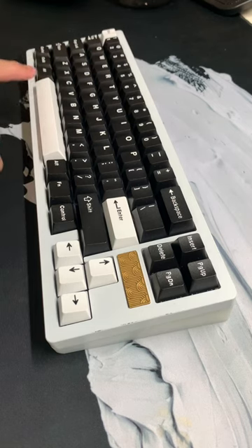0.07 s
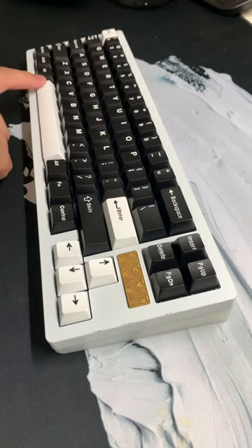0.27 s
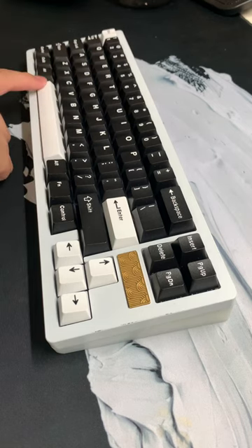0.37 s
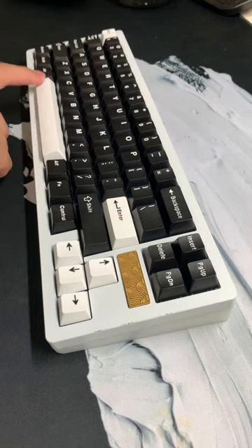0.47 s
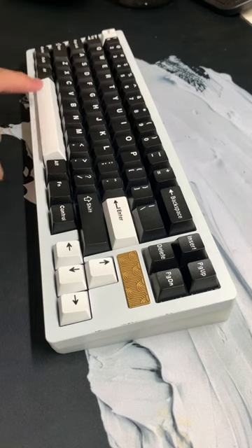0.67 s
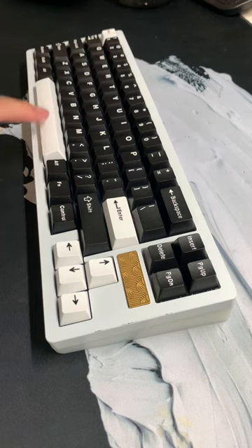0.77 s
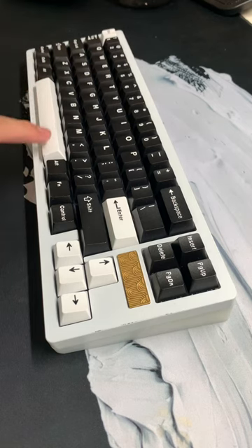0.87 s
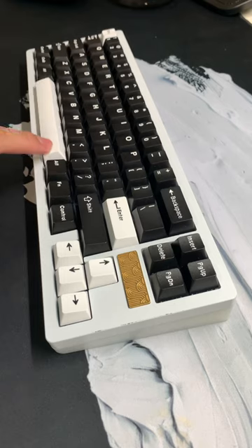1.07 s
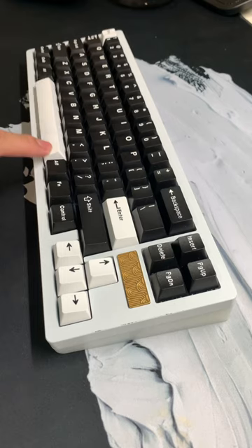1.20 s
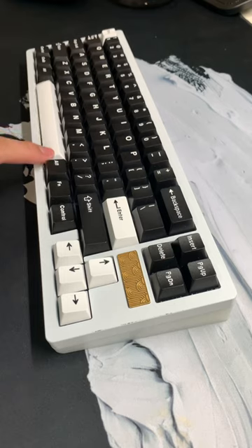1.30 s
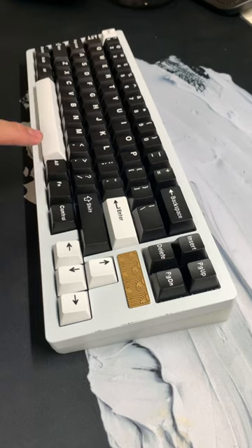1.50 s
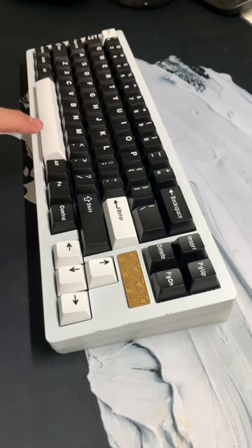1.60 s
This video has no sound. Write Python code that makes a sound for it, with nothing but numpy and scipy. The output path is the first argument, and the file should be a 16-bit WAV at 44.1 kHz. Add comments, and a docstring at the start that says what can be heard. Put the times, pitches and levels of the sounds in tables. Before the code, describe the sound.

Close by in a quiet room, a finger taps a mechanical keyboard spacebar in two quick sets of three. It clicks sharply going down and springing back, the second set fuller, over a faint low hum.

```python
"""At a desk in a small room, a finger taps the spacebar of a mechanical keyboard three times toward its
left end, then three times at its right end. Each press slides down with friction and clacks on the plate;
each release knocks the bar against its top stop. The impacts excite damped modes of bar and case,
the desk and the room reflect the sound, and a low hum lies underneath."""
import sys
import numpy as np
from scipy import signal
from scipy.fft import rfft, irfft
from scipy.io import wavfile

SR = 44100
rng = np.random.default_rng(int(sys.argv[2]) if len(sys.argv) > 2 else 0)


def unload_audio(sound):
    """Save the sound as a 16-bit wav file, at the path given as the first command line argument."""
    columns = np.transpose(np.atleast_2d(sound))
    # keep every value between -1 and 1, then stretch to whole-number steps
    steps = np.round(np.clip(columns, -1, 1) * 32767)
    wavfile.write(sys.argv[1], SR, steps.astype(np.int16))


N = 72765

# Rumble and hiss: f/Hz, relative spectral level/dB
AIR_SPECTRUM = [(12, -68), (20, -31), (43, -11.5), (65, -3), (81, -11), (130, -2.5), (163, -20.5),
                (198, -14), (347, -24), (377, -35), (558, -28), (849, -33), (949, -34.5), (1090, -37.5),
                (2750, -50.5), (9670, -55.5), (16000, -64.5)]
# Hum bands: f/Hz, level/dB, width/Hz
HUM_BANDS = [(56, -63.5, 2.3), (130.9, -64, 2.3), (233.4, -75.5, 2.7)]
# Diffuse field: f/Hz, left-right correlation
COHERENCE = [(50, 0.94), (250, 0.74), (700, 0.32), (1500, 0.057), (7000, 0.14), (10500, .9)]
# Finger brushing the bar: t/s, relative level/dB
TOUCHES = [(.1945, 6), (0.956, -13), (1.346, -3)]
# Stem friction: f/Hz, level/dB
SLIDE_TONE = [(200, -8.5), (1000, -3), (2500, 2.5), (5500, -1), (7500, -6), (14000, -25)]
# Bar hitting the plate: t/s, level/dB, thock/dB, clack/dB, treble/dB, place (0 left, 1 right)
PRESSES = [(0.2094, 2.5, -0.5, -1, -2, 0.11), (0.3631, -0.5, 1.5, -3, -2, 0.35),
           (0.5144, 0.5, -1, 0, -2.5, 0.081), (0.9705, 0, 5.5, 1, 4.5, 0.95),
           (1.1203, 0, 3.5, 2.5, 2.5, 0.92), (1.2741, -1, 7, 1, 3, 0.94)]
# Bar hitting its top stop: columns as in PRESSES, then the other end's delay/s, relative level/dB
RELEASES = [(0.301, -5.5, -0.5, -4, 1, 0.29, 0.00072, -7.5), (.4437, -1.5, -5.5, -4, -5.5, 0.19, .0008, -9),
            (.6016, 0.5, -1.5, -8.5, -3.5, 0.43, .0009, -5.5), (1.0546, -7, 1, -3, -8, 1, .0019, -15),
            (1.203, -12, 1, 0, -2, 1, .0017, 2.5), (1.3567, -7, 8.5, 3, 1, 0.84, .0014, -3)]
# Contact spectra: f/Hz, left-end level/dB, right-end level/dB
PRESS_TONE = [(60, -18, -14.5), (201, -11, -6.5), (402, -14.5, -13), (1170, -15, -14.5), (1550, -6, -4),
              (2540, 5, 1.5), (3300, -1.5, 3.5), (5200, -1, -13.5), (7880, -4, -9), (8800, 5.5, -5),
              (10600, -15, -25.5), (13600, -10, -17.5), (16450, -26, -31)]
RELEASE_TONE = [(59.7, -40.5, -23.5), (250, -42, -14.5), (450, -27, -24), (975, -20, -3), (1500, 3.5, -12),
                (2600, 6, -4.5), (3800, -9, -7.5), (4900, -0.5, -4), (7400, 4.5, -3.5), (10000, -0.5, -15),
                (14500, -4, -19), (16000, -32, -56.5)]
# Bar and case: f/Hz, T60/s, level/dB for left press, right press, left release, right release
MODES = [(216.3, 0.038, -69.5, -47.5, -53, -40.5), (274.9, 0.056, -37, -46.5, -36.5, -55.5),
         (777.6, 0.014, -33, -49, -24.5, -35), (899, 0.013, -43.5, -43, -21.5, -46.5),
         (1228, 0.049, -50, -50, -65.5, -43.5), (1908, 0.021, -27, -29, -24.5, -35),
         (1965, 0.25, -70.5, -53.5, -60.5, -63), (2634, 0.084, -36.5, -56, -69.5, -66.5),
         (2690, .05, -43.5, -47.5, -58, -66.5), (3036, 0.0082, -40, -37.5, -46.5, -43),
         (4503, .018, -32, -24, -56.5, -46.5), (4774, 0.0096, -37.5, -23.5, -24, -53),
         (5077, 0.0098, -18, -18, -34.5, -46), (5815, 0.075, -30, -33.5, -31.5, -35.5),
         (6302, 0.038, -33.5, -35.5, -49.5, -38), (8530, 0.01, -35, -29.5, -13, -29)]
# Nearby surfaces: left delay/s, right delay/s, left level/dB, right level/dB
ECHOES = [(.0016, .0014, -27.5, -7.5), (.0057, .0059, -41, -21.5), (.0074, .0078, -24, -10.5),
          (.0268, .0271, -27, -27.5)]
# Desk clutter: f/Hz, level/dB
SCATTER_TONE = [(200, -0.5), (400, -3), (700, -6.5), (2200, 0), (3600, -2.5), (5000, -6.5), (9000, -8),
                (15000, -2.5)]
# Reverberation: f/Hz, level/dB, T60/s
ROOM_BANDS = [(149, -10, .4), (320.6, -8, 0.47), (710, -8, 0.13), (1288, -13.5, 0.4), (2283, -5.5, 0.24),
              (4700, -14, 0.22), (8900, -14, 0.17), (15000, -13, 0.21)]
# Channel balance: f/Hz, left minus right level/dB
BALANCE = [(200, 2.5), (800, 2.4), (1800, 1.5), (2800, 5), (4200, -3.5), (5200, -6), (6200, -6.5),
           (8000, -1.5), (14000, -1)]
# Microphone ports: f/Hz, phase lead of the left/rad
PORT_PHASE = [(0, 0), (800, .7), (1700, 3.2), (2800, 2.9), (4200, 5.8), (5800, 7.6), (6500, 7.5),
              (7600, 10.6), (8500, 10), (9100, 8.4), (10000, 6.9), (11400, 3.6), (12300, 2.7), (13000, 1),
              (15000, -2.7)]

SIZE = 16384  # samples in one impact or impulse response
T, HZ = np.arange(SIZE) / SR, np.fft.rfftfreq(SIZE, 1 / SR)
SLIDE_SAMPLES = SIZE // 8


def amp(db):
    """A level in decibels is twenty times the logarithm of an amplitude ratio."""
    return 10 ** (np.asarray(db) / 20)


def unit(x):
    """Normalisation to unit energy."""
    return x / np.sqrt(np.sum(x ** 2, -1, keepdims=True) + 1e-20)


def read(points, hz, column=1):
    """Interpolation of a table column along log frequency."""
    table = np.transpose(points)
    return np.interp(np.log(hz + 1), np.log(table[0] + 1), table[column])


def add(mix, start_s, sound):
    """Superposition: a sound adds linearly to the mix."""
    part = mix[..., round(start_s * SR):][..., :sound.shape[-1]]
    part += sound[..., :part.shape[-1]]


def colour(x, db):
    """Minimum-phase filtering: the phase is the Hilbert transform of the log gain, negated."""
    log_gain = np.log(amp(np.r_[db, db[-2:0:-1]]))
    taps = np.fft.ifft(np.exp(np.conj(signal.hilbert(log_gain)))).real[:SIZE // 8]
    return signal.fftconvolve(x, taps)[:len(x)]


def whiten(x):
    """Whitening evens the magnitude spectrum and keeps the phase."""
    spectrum = rfft(x)
    return irfft(spectrum / (abs(spectrum) + 1e-12))


def diffuse(size):
    """A diffuse field is partly coherent at two microphone ports."""
    left, independent = rfft(rng.standard_normal((2, size)))
    coherence = np.clip(read(COHERENCE, np.fft.rfftfreq(size, 1 / SR)), -1, 1)
    right = coherence * left + np.sqrt(1 - coherence ** 2) * independent
    return irfft(np.array([left, right]), size)


def background(air_db=-56):
    """Broadband noise gives rumble and hiss; beating within narrow bands makes the hum waver."""
    hz = np.fft.rfftfreq(N, 1 / SR)
    air = irfft(rfft(diffuse(N)) * amp(read(AIR_SPECTRUM, hz)), N)
    phasors = np.exp(2j * np.pi * rng.random(len(hz)))
    hum = sum(amp(db) * unit(irfft(phasors / (1 + (2 * (hz - centre) / width) ** 2), N))
              for centre, db, width in HUM_BANDS)
    return (amp(air_db) * unit(air) + hum) * np.sqrt(N)


def burst(decay_s):
    """Irregular contact gives broadband noise that decays exponentially."""
    envelope = np.exp(-T / decay_s)
    noise = envelope * rng.standard_normal(SIZE)
    for _ in range(2):
        noise = whiten(noise) * np.sqrt(envelope)
    return unit(noise)


def touch(gain_db=-27.5):
    """Friction of the fingertip on the bar makes a faint, brief brush."""
    return amp(gain_db) * colour(burst(decay_s=0.0029), read(RELEASE_TONE, HZ))


def slide():
    """Sliding friction of the stem swells until it meets its stop."""
    friction = unit(np.exp(-T / 0.0073) * rng.standard_normal(SIZE))
    swell = friction[:SLIDE_SAMPLES][::-1]
    return colour(swell, read(SLIDE_TONE, HZ))


def between(left, right, place):
    """Excitation depends on the point of impact, interpolated between the bar's ends."""
    return left + np.clip(place, 0, 1) * (right - left)


def contact(tone, place, tick_db=-5.5):
    """A short impact has a broad spectrum: a tick and a millisecond of plastic chatter."""
    impact = amp(tick_db) * (T == 0) + burst(decay_s=0.00066)
    power = abs(rfft(impact)) ** 2
    flat = unit(colour(impact, -10 * np.log10(power + .004 * power.mean())))
    return colour(flat, between(read(tone, HZ), read(tone, HZ, column=2), place))


def ring(left_db, right_db, place, build_s=0.0003):
    """Free vibration of bar and case is a sum of damped normal modes."""
    modes = sum(amp(db - 60 * T / t60) * np.sin(2 * np.pi * hz * T)
                for (hz, t60, *_), db in zip(MODES, between(left_db, right_db, place)))
    return modes * (1 - np.exp(-T / build_s))


def timbre(hit, thock_db, clack_db, treble_db, thock_hz=1060, clack_hz=2130, treble_hz=6750):
    """The spectral envelope sets a stroke's timbre: low shelf, middle bell, high shelf."""
    thock = thock_db / (1 + (HZ / thock_hz) ** 4)
    clack = clack_db * np.exp(-2 * np.log2((HZ + 1) / clack_hz) ** 2)
    treble = treble_db * (1 - 1 / (1 + (HZ / treble_hz) ** 6))
    return colour(hit, thock + clack + treble)


def strokes(press_slide_db=-15.5, release_slide_db=-17):
    """Friction leads to impact as the bar falls or springs back; yields (start/s, sound)."""
    slide_s = SLIDE_SAMPLES / SR
    _, _, down_left, down_right, up_left, up_right = np.transpose(MODES)
    for t, db, *band_db, place in PRESSES:
        hit = contact(PRESS_TONE, place) + ring(down_left, down_right, place)
        yield t - slide_s, amp(db) * np.r_[amp(press_slide_db) * slide(), timbre(hit, *band_db)]
    for t, db, *band_db, place, late_s, late_db in RELEASES:
        hit = contact(RELEASE_TONE, place) + ring(up_left, up_right, place)
        add(hit, late_s, amp(late_db) * contact(RELEASE_TONE, place))  # the other end lands
        yield t - slide_s, np.r_[amp(release_slide_db) * slide(), amp(db) * timbre(hit, *band_db)]


def desk_scatter(t60=0.051, onset_s=0.0021):
    """Scattering from things on the desk gives dense early reflections."""
    rise = np.clip(T / onset_s - .5, 0, 1)
    scatter = diffuse(SIZE) * amp(-60 * T / t60) * rise
    for _ in range(3):
        scatter = whiten(scatter) * amp(-20 * T / t60) * rise
    return unit(scatter)


def room_tail(onset_s=0.0079):
    """Reverberation decays exponentially, at its own rate in each band."""
    hz, t, spectra = signal.stft(diffuse(SIZE), SR, nperseg=256)
    decay = amp(-60 * t / read(ROOM_BANDS, hz, column=2)[:, None])
    tail = signal.istft(spectra * decay, SR, nperseg=256)[1][:, :SIZE]
    return unit(tail * np.clip(T / onset_s - .5, 0, 1))


def propagate(sound, scatter, echo_cutoff_hz=3500):
    """Convolution with the sum of all paths: direct sound, echoes, scatter and reverberation."""
    direct, tail = T == 0, room_tail()
    channels = []
    for side in range(2):
        echoes = np.zeros(SIZE)
        for row in ECHOES:
            echoes[round(row[side] * SR)] += amp(row[2 + side])
        echoes = colour(echoes, -10 * np.log10(1 + (HZ / echo_cutoff_hz) ** 4))
        desk = colour(scatter[side], read(SCATTER_TONE, HZ))
        room = colour(tail[side], read(ROOM_BANDS, HZ))
        response = colour(direct + echoes + desk + room, (.5 - side) * read(BALANCE, HZ))
        channels.append(signal.fftconvolve(sound, response))
    return np.array(channels)


def scene():
    """Touches, strokes and their reflections superpose on the background."""
    mix, scatter = background(), desk_scatter()
    for t, db in TOUCHES:
        add(mix, t, propagate(amp(db) * touch(), scatter))
    for t, sound in strokes():
        add(mix, t, propagate(sound, scatter))
    return mix


def record(dry, cutoff_hz=16600):
    """A phase difference separates the microphone ports; a low-pass limits the bandwidth."""
    phase = np.interp(np.fft.rfftfreq(N, 1 / SR), *np.transpose(PORT_PHASE))
    right = irfft(rfft(dry[1]) * np.exp(-1j * phase), N)
    lowpass = signal.firwin(511, cutoff_hz, window=("kaiser", 9), fs=SR)
    return signal.oaconvolve(np.array([dry[0], right]), lowpass[None], "same")


dry = scene()
out = record(dry)
unload_audio(out)
```